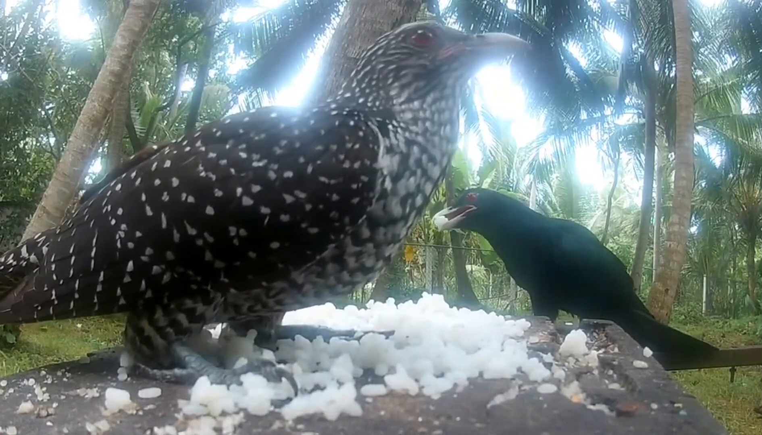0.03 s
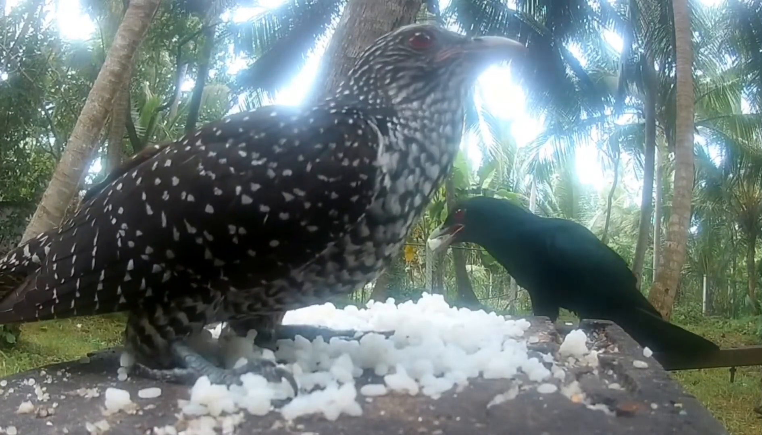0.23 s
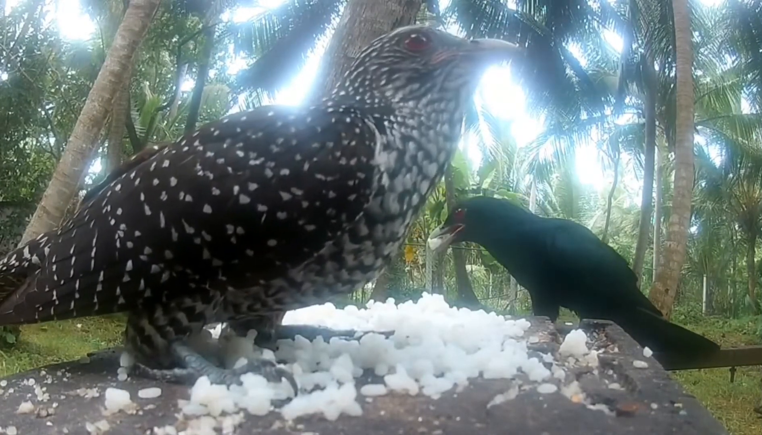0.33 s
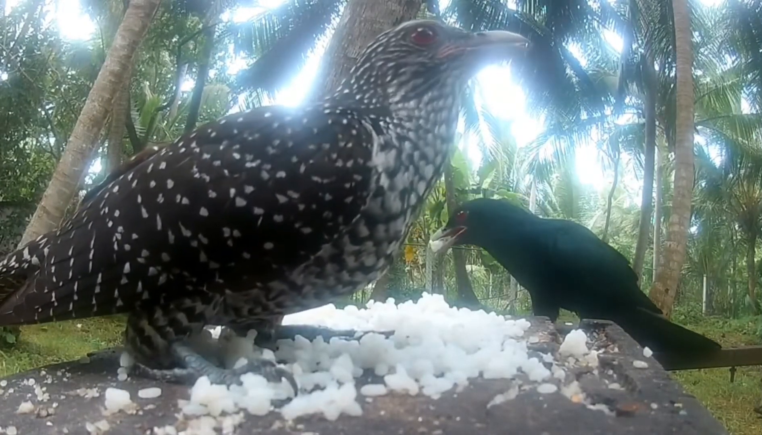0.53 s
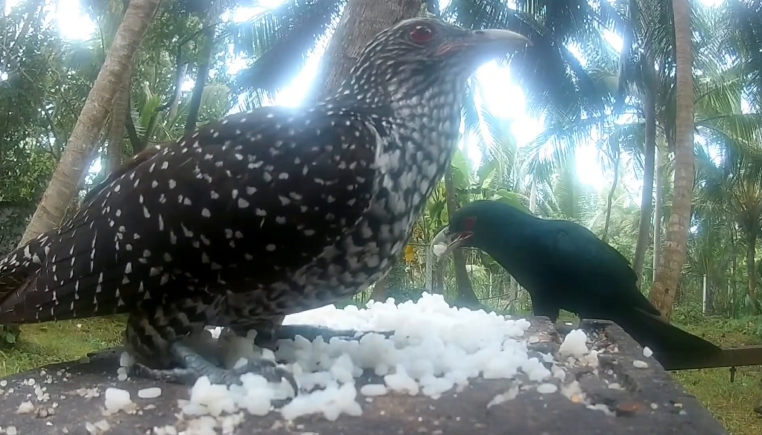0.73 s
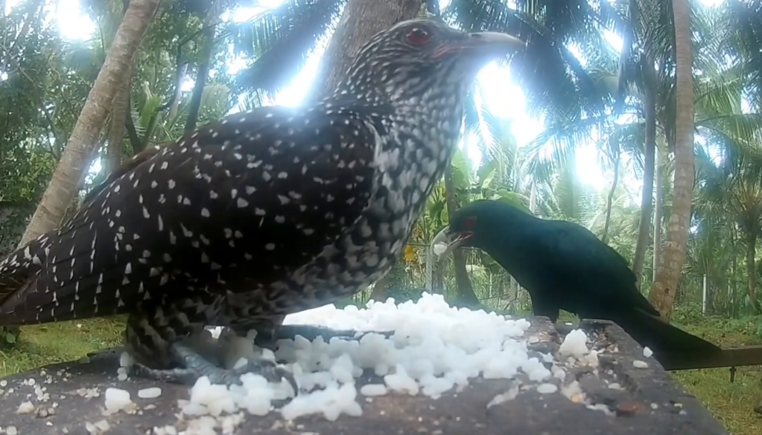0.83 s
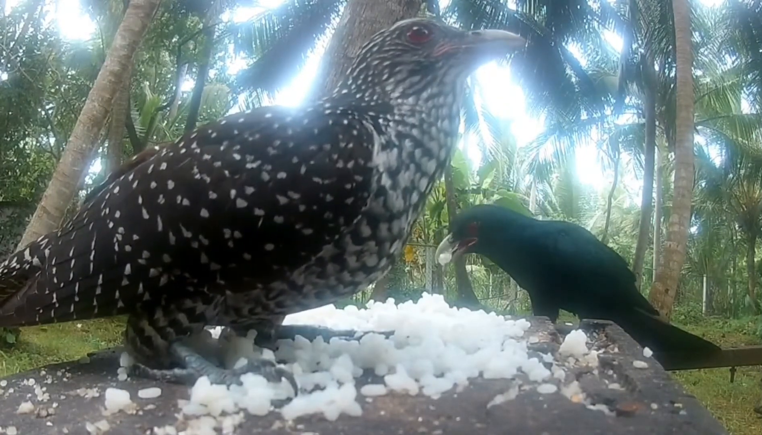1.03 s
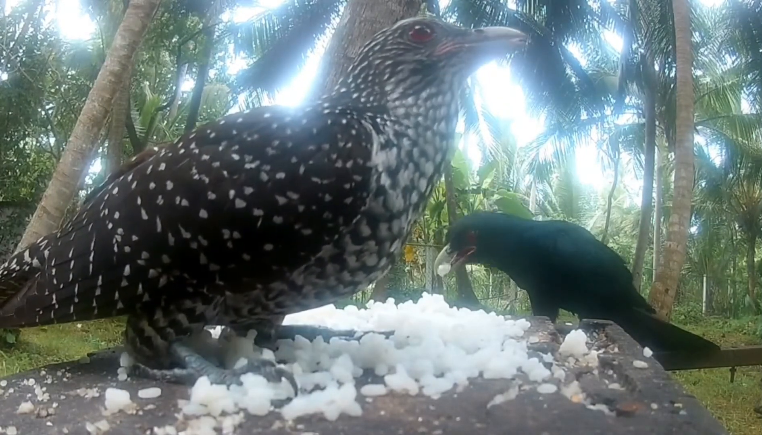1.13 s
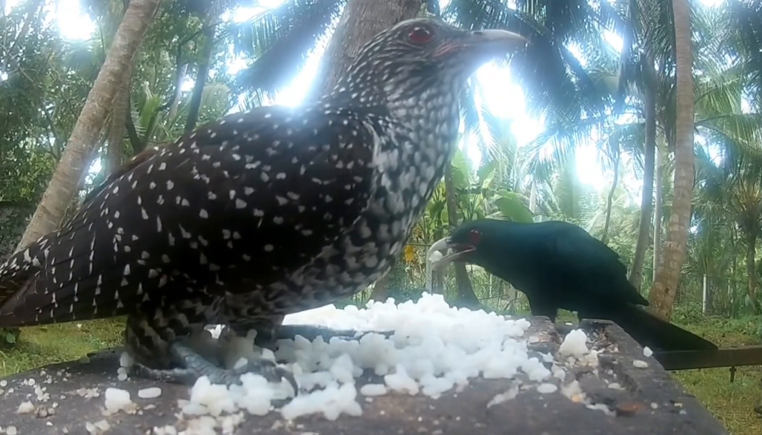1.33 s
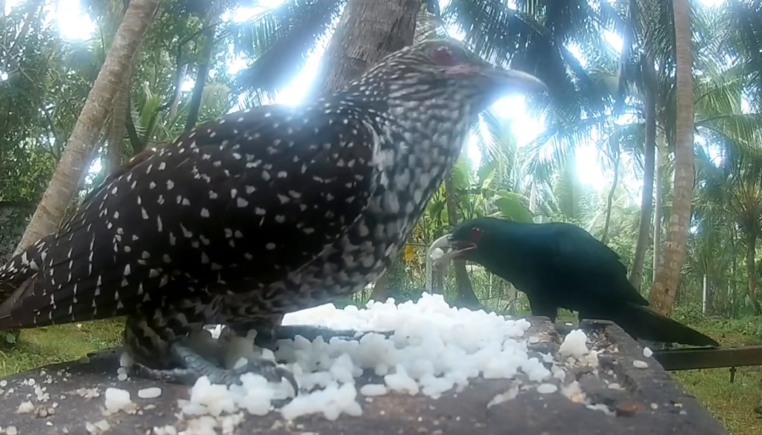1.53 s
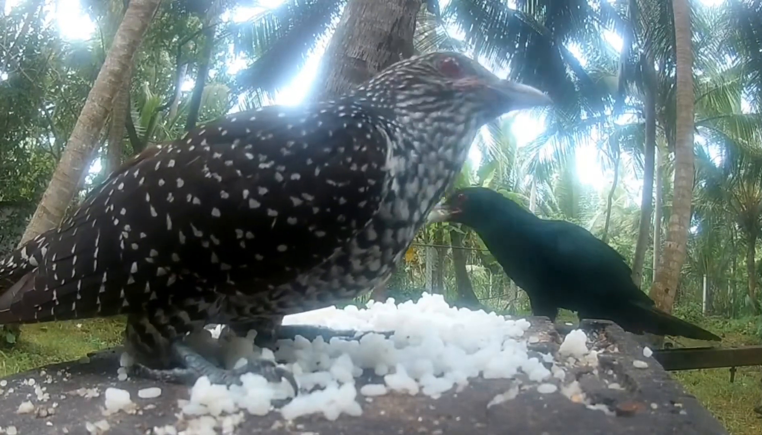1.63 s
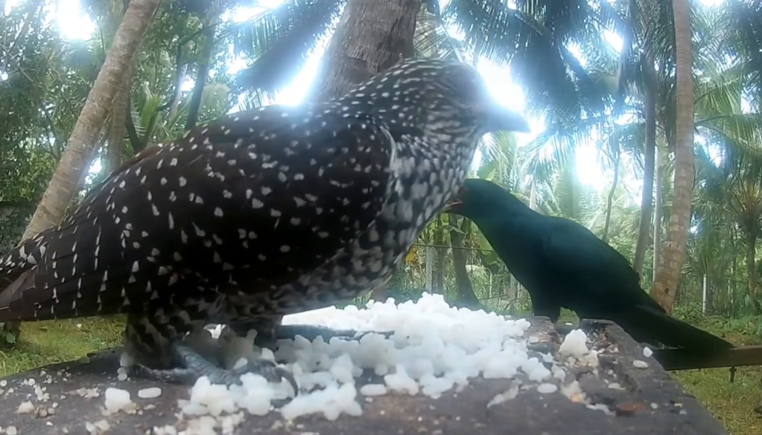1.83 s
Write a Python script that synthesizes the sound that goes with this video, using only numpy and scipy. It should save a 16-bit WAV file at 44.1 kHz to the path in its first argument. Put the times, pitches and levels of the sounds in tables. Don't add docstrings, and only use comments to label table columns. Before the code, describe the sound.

A large bird close to a small microphone gives a hoarse rasp, one short pure whistle rising and sinking, then another rasp and a faint breath, over low rumble and soft hiss in a palm garden.

```python
import sys
import numpy as np
from scipy import signal
from scipy.fft import rfft, irfft, next_fast_len
from scipy.io import wavfile
from scipy.ndimage import uniform_filter1d, map_coordinates

SR = 44100
rng = np.random.default_rng(int(sys.argv[2]) if len(sys.argv) > 2 else 0)


def dump(signal):
    limited = np.clip(np.atleast_2d(signal).T, -1, 1)
    pcm = np.round(limited * 32767).astype(np.int16)
    wavfile.write(sys.argv[1], SR, pcm)


def rack_gain(trim_db):
    fader = np.asarray(trim_db, float)
    return 10 ** (fader / 20)


N = 83790

# pitch_hz, density_db (per Hz)
RUMBLE_SPECTRUM = [(12, -37.5), (20, -2.5), (123, -2.5), (204, -8), (237, -7), (1000, -18.5), (1300, -45.5),
                   (2200, -120)]
HISS_SPECTRUM = [(590, -39), (1000, -8), (1330, -2), (1450, -9.5), (1840, -7.5), (2190, -14.5),
                 (9140, -27.5), (15000, -24.5), (15700, -25.5)]
# pitch_hz, rms_db
MAINS_HUM = [(60.15, -74), (120.3, -76), (180.45, -77), (240.6, -79.5)]
# start_s, attack_s, peak_db, fall_db_per_s, end_s
RASPS = [
    (-.031, .031, -52, 150, .068),
    (.182, .024, -44.5, 10, .235),
    (.361, .011, -47.5, 200, .449),
    (.485, .025, -66, 40, .565),
    (.228, .008, -63, 120, .272),
]
THROAT_WIDTH = [1.47, 2.3, 0.97, 0.57, .7]
THROAT_PITCH = [0.96, 1.047, 0.968, .98, 1.25]
# pitch_hz, width_hz, level_db
THROAT = [(850, 80, -8), (1345, 175, 0), (3450, 300, -38)]
# time_s, pitch_hz, first_partial_db, second_partial_db
WHISTLE = [
    (.214, 830, -63, -72),
    (.232, 1043, -47, -74),
    (.25, 1147, -36, -83),
    (.271, 1184, -32.8, -86),
    (.296, 1142, -36, -77.5),
    (.316, 1058, -45, -71.5),
    (.333, 980, -59.5, -69),
    (.353, 842, -59, -66),
    (.378, 655, -72, -58),
]
# multiple, peak_db (re first partial), growth_db_per_db
ODD_PARTIALS = [(3.0, -23, 1.12), (5.0, -44, 1.5), (7.0, -58, 1.4), (9.0, -57.5, 1.2)]
# pitch_hz, width_hz, level_db (re second partial)
BEAK = [(4200, 350, -14), (5250, 400, -15), (6250, 350, -12), (8600, 400, -20), (11000, 800, -14)]
CROSSING_LIFT = 7, 12

RUMBLE_DB, HISS_DB = -64.5, -72
DRONE_HZ, DRONE_WIDTH_HZ, DRONE_DB = 1312, 110 * 1.46, -75
FLUTTER_HZ, FLUTTER_SCATTER, FLUTTER_DEPTH = 130.8, 0.25, 0.26
STEADY_S = 0.013
THROAT_LOW_HZ, THROAT_TOP_HZ = 690, 1790
JITTER, SHIMMER_DB, EDGE_S, GLIDE_S = 0.001, 0.15, 0.008, 0.006
WEAK_VOICE_DB, WEAK_ROUGH_DB = -54, 2.2
ECHO_DB, ECHO_T60_S = -27, 0.16
BASS_CUT_HZ = 18


def unit(x):
    return x / np.sqrt(np.mean(x ** 2) + 1e-20)


def wobble(rate):
    knots = rng.standard_normal(int(N * rate / SR) + 4)
    return map_coordinates(knots, [np.arange(N) * rate / SR])


def filtered(x, response):
    m = next_fast_len(N + 8192)
    return irfft(rfft(x, m) * response(np.fft.rfftfreq(m, 1 / SR)), m)[:N]


def peak(f, hz, width):
    return 1j * f * width / (hz * hz - f * f + 1j * f * width)


def noise(response):
    return unit(filtered(rng.standard_normal(N), response))


def spectrum_noise(spectrum):
    hz, db = np.transpose(spectrum)
    return noise(lambda f: rack_gain(np.interp(np.log(f + 1), np.log(hz + 1), db)))


def garden():
    t = np.arange(N) / SR
    rumble = rack_gain(RUMBLE_DB + 0.6 * wobble(5.6)) * spectrum_noise(RUMBLE_SPECTRUM)
    hiss = rack_gain(HISS_DB + 0.24 * wobble(5.1)) * spectrum_noise(HISS_SPECTRUM)
    drone = noise(lambda f: peak(f, DRONE_HZ, DRONE_WIDTH_HZ) ** 2)
    drone = rack_gain(DRONE_DB + 0.76 * wobble(3.8)) * drone
    hum = np.zeros(N)
    for hz, db in MAINS_HUM:
        hum += rack_gain(db + 0.5 * wobble(6)) * np.sqrt(2) * np.sin(2 * np.pi * hz * t)
    return rumble + hiss + drone + hum


def throat_response(f, width_ratio, pitch_ratio):
    gain = 0
    for hz, width, db in THROAT:
        ring = rack_gain(db) * abs(peak(f, hz * pitch_ratio, width * width_ratio * 1.08)) ** 2
        if hz < THROAT_TOP_HZ:
            ring = ring / (1 + (f / THROAT_TOP_HZ) ** 10)
        gain = gain + ring
    return gain / (1 + (THROAT_LOW_HZ / (f + 1)) ** 10)


def rasp():
    t = np.arange(N) / SR
    span = int(STEADY_S * SR)
    out = np.zeros(N)
    for (start, attack, db, fall_db, end), width, pitch in zip(RASPS, THROAT_WIDTH, THROAT_PITCH):
        flutter_hz = FLUTTER_HZ * (1 + FLUTTER_SCATTER * wobble(50))
        flap = np.cos(2 * np.pi * np.cumsum(flutter_hz) / SR)
        breath = rng.standard_normal(N) * (1 + FLUTTER_DEPTH * flap)
        voiced = filtered(breath, lambda f: throat_response(f, width, pitch))
        voiced = np.roll(voiced, N // 2)
        power = uniform_filter1d(uniform_filter1d(voiced ** 2, span), span)
        voiced = unit(voiced / np.sqrt(np.abs(power) + 1e-12))
        rise = np.clip((t - start) / attack, 0, 1) ** 1.13
        close = np.clip((end - t) / 0.017, 0, 1)
        fall = rack_gain(db - fall_db * np.maximum(t - start - attack, 0))
        out += voiced * rise * close * fall
    return out


def glide(values, position):
    curve = map_coordinates(values, [position], order=2, mode="nearest")
    return uniform_filter1d(curve, int(GLIDE_S * SR))


def whistle():
    t = np.arange(N) / SR
    s, *columns = np.transpose(WHISTLE)
    position = np.interp(t, s, np.arange(len(s)))
    hz, first_db, second_db = [glide(column, position) for column in columns]
    turn = 2 * np.pi * np.cumsum(hz * (1 + JITTER * wobble(140))) / SR

    low, high = [abs(peak(k * hz, centre, width * 1.4)) ** 2
                 for k, (centre, width, _) in zip((1, 2), THROAT)]
    out = rack_gain(first_db + CROSSING_LIFT[0] * low) * np.sin(turn)
    out += rack_gain(second_db + CROSSING_LIFT[1] * high) * np.sin(2 * turn + 1)

    top_db = first_db.max()
    for k, db, growth in ODD_PARTIALS:
        effort_db = max(growth, 1.1) * (first_db - top_db)
        out += rack_gain(top_db + db + effort_db + 1.2 * wobble(60)) * np.sin(round(k) * turn)

    high_db = second_db + 2 * np.minimum(first_db - WEAK_VOICE_DB, 0)
    for k in (4, 5, 6, 8, 10):
        lift = sum(rack_gain(db) * abs(peak(k * hz, centre, width)) ** 2 for centre, width, db in BEAK)
        out += rack_gain(high_db) * lift * np.sin(k * turn)

    gate = np.clip((t - s[0]) / EDGE_S, 0, 1) * np.clip((s[-1] - t) / EDGE_S, 0, 1)
    weak_db = WEAK_ROUGH_DB * np.clip((WEAK_VOICE_DB + 3.5 - first_db) / 8, 0, 1)
    waver = rack_gain(SHIMMER_DB * wobble(80) + weak_db * wobble(141.2))
    return np.sqrt(2) * gate * waver * out


def trees(x):
    t = np.arange(SR // 4) / SR
    decay = 10 ** (-3 * t / ECHO_T60_S)
    tail = rng.standard_normal(len(t)) * decay * (t > 0.004)
    return rack_gain(ECHO_DB) * signal.fftconvolve(x, tail / np.linalg.norm(tail))[:N]


def scene():
    bird = rasp() + whistle()
    return (garden() + bird + trees(bird))[None]


def roll_off(x):
    return signal.sosfilt(signal.butter(12, 15850, fs=SR, output="sos"), x)


def record(dry):
    mix = filtered(dry[0], lambda f: 1j * f / (BASS_CUT_HZ + 1j * f))[None]
    return roll_off(mix)


dry = scene()
out = record(dry)
dump(out)
```